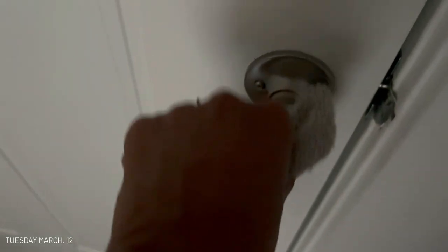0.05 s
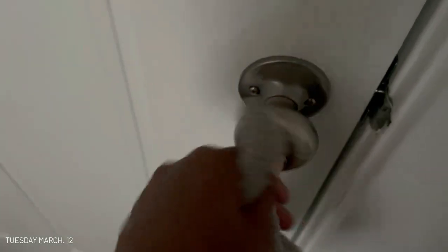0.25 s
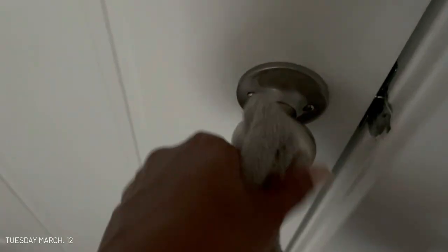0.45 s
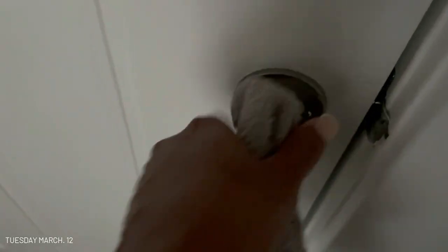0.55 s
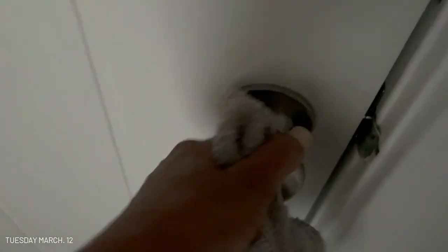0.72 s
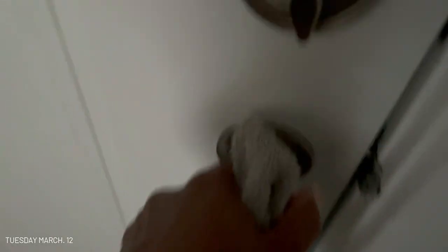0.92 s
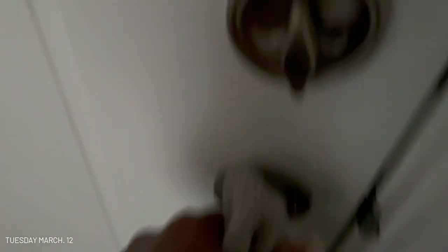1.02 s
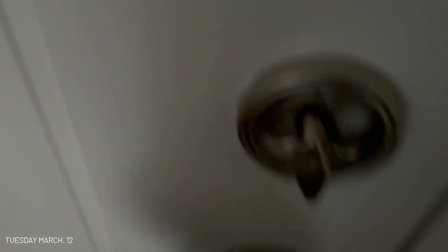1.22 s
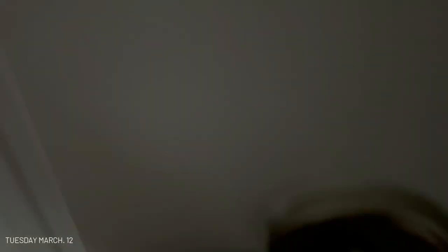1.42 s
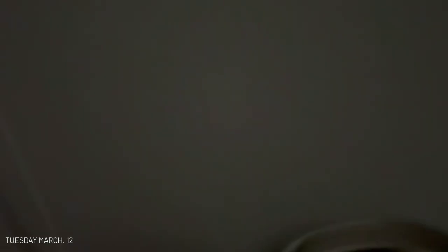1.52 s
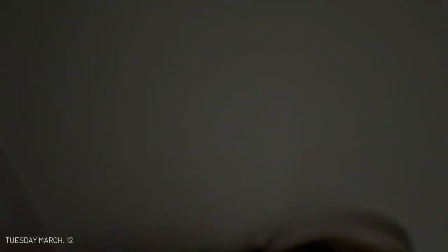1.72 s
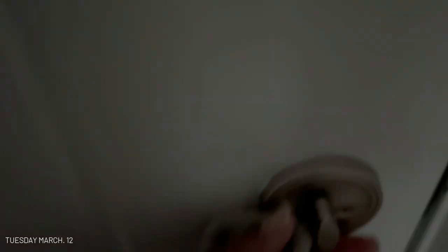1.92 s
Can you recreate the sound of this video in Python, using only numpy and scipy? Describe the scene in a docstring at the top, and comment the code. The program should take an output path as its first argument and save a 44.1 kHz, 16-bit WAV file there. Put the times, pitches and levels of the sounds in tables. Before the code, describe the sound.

A loose metal door knob clicks and rattles irregularly as a cloth rubs over it, with soft door thuds. Then the cloth brushes close past the microphone with a bump and a snap, over a small room's low hum.

```python
"""Over the low hum of a small quiet room, a cloth hisses and scratches across a metal door knob.
The loose knob clicks, rattles and rings as it is pushed against its stops, and the door thuds in its frame.
Then the cloth brushes past close to the microphone, with a soft bump and one sharp snap.
Clicks are noise bursts plus ringing modes, thuds are damped sines, and the cloth is shaped noise."""
import sys
import numpy as np
from scipy import signal
from scipy.fft import rfft, irfft, next_fast_len
from scipy.io import wavfile

SR = 44100
rng = np.random.default_rng(int(sys.argv[2]) if len(sys.argv) > 2 else 0)


def dump(signal):
    """Clip the signal to [-1, 1] and save it as 16-bit WAV at the path in sys.argv[1]."""
    limited = np.clip(np.atleast_2d(signal).T, -1, 1)
    pcm = np.round(limited * 32767).astype(np.int16)
    wavfile.write(sys.argv[1], SR, pcm)


N = 85995
HIT = np.arange(SR // 2) / SR  # time within one hit [s]

# EQ of the room tone and the handling rumble: (frequency [Hz], gain [dB])
ROOM_TONE_EQ = [(25, -18.5), (50, -6), (140, -0.5), (550, -13), (900, -22), (16000, -53.5)]
RUMBLE_EQ = [(25, -47), (50, 10), (100, 0.5), (400, -39)]
# fader rides of the rumble, the wipe on the knob and the close brush: (time [s], level [dB])
RUMBLE_FADER = [(0, -63), (.3, -56.5), (1.56, -49.5), (1.6, -38), (1.65, -43.5), (1.71, -52.5)]
WIPE_FADER = [(.085, -69), (.125, -47.5), (.2, -57.5), (.35, -51), (.45, -62), (.62, -47), (.75, -70),
              (.9, -54), (1.1, -62), (1.27, -48.5), (1.36, -88)]
BRUSH_FADER = [(.5, -81), (1.1, -61), (1.36, -65.5), (1.46, -55), (1.53, -57.5), (1.595, -48.5), (1.8, -67)]
# EQ of the cloth's wipe, brush and snap: (frequency [Hz], gain [dB])
WIPE_EQ = [(70, -19), (160, 13.5), (400, 1), (2000, -10), (5000, -27), (16000, -40)]
BRUSH_EQ = [(600, 6), (2000, -1.5), (7000, -11.5)]
SNAP_EQ = [(250, -4), (850, 3), (2600, -10), (4100, 3), (16000, -12.5)]
# knob clicks, layer balance: (time [s], door knock [dB], knob clank [dB], latch tick [dB])
CLICK_CUES = [(.121, -47.5, -44, -54), (0.2223, -60, -40, -40), (.225, -53, -39, -34.5),
              (.247, -44, -37, -40.5), (.326, -66, -41.5, -68), (.359, -47, -43, -50),
              (.370, -42, -49.5, -75), (0.476, -47, -49.5, -75), (.498, -49, -37, -60),
              (.507, -41, -37.5, -55), (0.5142, -28, -27.5, -36), (.528, -41, -63, -40),
              (.594, -40, -40.5, -51), (.604, -42, -45, -41.5), (.619, -39, -38.5, -67),
              (.789, -48, -45.5, -74), (0.8012, -32, -39, -45), (.807, -39, -36, -40.5),
              (0.8219, -40.5, -35, -39), (0.831, -38.5, -34.5, -49), (0.8359, -41, -32.5, -49),
              (0.9828, -46.5, -40.5, -39.5), (1.143, -55, -51, -58.5), (1.193, -47.5, -42, -77),
              (1.201, -42.5, -37.5, -44), (1.2223, -34.5, -35.5, -57), (1.261, -43, -48, -57),
              (1.276, -40, -39, -71)]
# EQ of those three layers: (frequency [Hz], gain [dB])
KNOCK_EQ = [(110, -22.5), (300, 1.5), (600, 6.5), (1700, -26)]
CLANK_EQ = [(550, -16), (1050, 0), (2200, -5), (3000, -11.5), (8000, -47)]
TICK_EQ = [(1800, -16), (3300, 5.5), (6000, -3.5), (8000, 3.5), (16000, -11)]
# modes of the knob's shell, the latch parts and the door panel: (frequency [Hz], relative level [dB])
SHELL_MODES = [(1190, -0.2), (1545, 4.9), (1810, 2.8), (2060, -2.3), (2245, 0.58)]
LATCH_MODES = [(5250, -8), (8550, 3.5), (11200, 0.5), (13500, -5.5)]
PANEL_MODES = [(199.65, -1), (253, -1), (306.7, -9), (477.8, -11.5), (581, -15.5)]
# hard catches that make one part of the knob or latch sing: (time [s], pitch [Hz], level [dB])
RING_CUES = [(0.2261, 11340, -32.5), (0.226, 13900, -41), (0.226, 2245, -34), (.229, 659, -34.5),
             (.515, 2300, -34.5), (0.517, 5030, -39), (.527, 549, -33), (0.8362, 1973, -28.5)]
# door thuds: (time [s], level [dB], pitch [Hz])
THUD_CUES = [(0.229, -33.5, 141.6), (.512, -36.5, 146), (.637, -28.5, 143.5), (.803, -28.5, 212.6),
             (.812, -33, 141), (.843, -28.5, 137.4), (1.009, -38.5, 204.3), (1.146, -38, 195),
             (1.223, -32.5, 146.6)]
# reverb decay: (frequency [Hz], T60 [s])
REVERB_T60 = [(600, 0.41), (3000, 0.13), (14000, 0.38)]
# reverb EQ: (frequency [Hz], gain [dB])
REVERB_EQ = [(1000, 2), (14000, -9)]
# stereo narrowness: (frequency [Hz], likeness of left and right [ratio, capped in use])
STEREO_LIKENESS = [(120, 1.32), (600, 0.39), (1200, 0.25), (2200, 0.57), (9000, 1.2)]
# stereo phase: (frequency [Hz], lead of the left [rad])
STEREO_LEAD = [(2200, -.1), (3700, 1.1), (7500, -.4), (10100, -3.14), (13300, -6.2), (16000, -8.7)]
# stereo balance: (frequency [Hz], left minus right [dB])
STEREO_TILT = [(5500, 2.5), (9500, -0.5)]


def amp(db):
    """Decibels to gain."""
    return 10 ** (np.asarray(db) / 20)


def decay(t60):
    """Envelope of a hit, falling 60 dB in t60 seconds."""
    return amp(-60 * HIT / t60)


def unit(x):
    """Scales to rms 1."""
    return x / np.sqrt(np.mean(x ** 2) + 1e-20)


def unit_hit(x, span_s=.007):
    """Scales each channel of a hit to the energy of a short span at rms 1."""
    return x / np.sqrt(np.sum(x ** 2, -1, keepdims=True) / (span_s * SR) + 1e-20)


def curve(points, hz):
    """Reads a table on a log-frequency axis."""
    f, value = np.transpose(points)
    return np.interp(np.log(hz + 1), np.log(f + 1), value)


def fader(points):
    """Gain over time from (time [s], level [dB]) points."""
    return amp(np.interp(np.arange(N) / SR, *np.transpose(points)))


def add(mix, s, sound):
    """Mixes a sound in at s seconds."""
    part = mix[:, max(round(s * SR), 0):][:, :sound.shape[1]]
    part += sound[:, :part.shape[1]]


def equalise(x, eq, size=2048):
    """Minimum-phase EQ."""
    log_gain = np.log(amp(curve(eq, abs(np.fft.fftfreq(size, 1 / SR)))))
    taps = np.fft.ifft(np.exp(np.conj(signal.hilbert(log_gain)))).real
    return signal.fftconvolve(x, taps[None], axes=1)[:, :x.shape[1]]


def noise(eq):
    """Steady coloured noise; like every source here, its two rows are mid and side."""
    return unit(equalise(rng.standard_normal((2, N)), eq, size=8192))


def crack(eq, t60, samples=6000, contact_db=11):
    """One hard contact, then dense chatter that dies fast."""
    burst = rng.standard_normal((2, samples)) * decay(t60)[:samples]
    burst[0, 0] = amp(contact_db)
    return unit_hit(np.pad(equalise(burst, eq), ((0, 0), (0, len(HIT) - samples))))


def modal_hits(modes, count, t60, spread_db=2.2, detune=0.0085):
    """An object rings for several blows; each new spot and grip shifts its modes a little."""
    hz, db = np.transpose(modes)[:, :, None]
    sign, size, shift = np.moveaxis(rng.standard_normal((count, 3, 2, len(modes), 1)), 1, 0)
    gains = np.sign(sign) * amp(db + spread_db * size)
    partials = gains * np.sin(2 * np.pi * hz * (1 + detune * shift) * HIT)
    return unit_hit(partials.sum(2) * decay(t60))


def room_bed(tone_db=-55.5, hum_hz=70.36, hum_db=-58):
    """Room tone with a low hum, and the rumble of the hand-held microphone."""
    hum = amp(hum_db) * np.sqrt(2) * np.sin(2 * np.pi * (hum_hz * np.arange(N) / SR + rng.random((2, 1))))
    return amp(tone_db) * noise(ROOM_TONE_EQ) + hum + fader(RUMBLE_FADER) * noise(RUMBLE_EQ)


def cloth_wipe(catches_per_s=360, scratch_s=0.0009, scratch_hz=(990, 2640), scratch_db=-5.5):
    """Cloth slides on metal: a soft hiss, and short scratches where the fibres catch."""
    catches = (rng.random(N) < catches_per_s / SR) * rng.random(N)
    grip = unit(signal.fftconvolve(catches, HIT * np.exp(-HIT / scratch_s))[:N])
    band = signal.butter(2, scratch_hz, "bandpass", fs=SR)
    scratch = unit(signal.lfilter(*band, rng.standard_normal((2, N))))
    return fader(WIPE_FADER) * (noise(WIPE_EQ) + amp(scratch_db) * grip * scratch)


def knob_clicks(shell_db=-8.5, latch_db=-8, trim_db=-2):
    """The loose knob hits its stops: the door knocks, the shell clanks, the latch ticks and shimmers."""
    out = np.zeros((2, N))
    shells = modal_hits(SHELL_MODES, len(CLICK_CUES), t60=0.074)
    latches = modal_hits(LATCH_MODES, len(CLICK_CUES), t60=0.064)
    for (s, knock_db, clank_db, tick_db), shell, latch in zip(CLICK_CUES, shells, latches):
        knock = crack(KNOCK_EQ, t60=0.04)
        clank = crack(CLANK_EQ, t60=0.023) + amp(shell_db) * shell
        tick = crack(TICK_EQ, t60=0.025) + amp(latch_db) * latch
        add(out, s, amp(knock_db) * knock + amp(clank_db) * clank + amp(tick_db) * tick)
    return amp(trim_db) * out


def metal_rings(q=1 / 0.065):
    """Chattering contact drives one resonance, which the cloth soon damps."""
    out = np.zeros((2, N))
    for s, hz, db in RING_CUES:
        chatter = rng.standard_normal((2, len(HIT))) * decay(t60=0.03)
        ring = signal.lfilter(*signal.iirpeak(hz, q, SR), chatter)
        add(out, s, amp(db) * unit_hit(ring))
    return out


def door_thuds(attack_s=0.0018, panel_db=-3.5):
    """The door is nudged against its frame: a low push, then the panel rings."""
    out = np.zeros((2, N))
    attack = 1 - np.exp(-HIT / attack_s)
    phases = np.array([[0], [np.pi / 2]])  # mid, side
    for (s, db, hz), panel in zip(THUD_CUES, modal_hits(PANEL_MODES, len(THUD_CUES), t60=0.32)):
        push = unit_hit(np.sin(2 * np.pi * hz * HIT + phases) * decay(t60=0.12))
        add(out, s, amp(db) * attack * (push + amp(panel_db) * panel))
    return out


def close_cloth(bump_s=1.4665, snap_s=1.6243, snap_db=-32.5):
    """Cloth brushes past the microphone, bumps and snaps once."""
    out = fader(BRUSH_FADER) * noise(BRUSH_EQ)
    add(out, bump_s, soft_bump())
    add(out, snap_s, amp(snap_db) * crack(SNAP_EQ, t60=0.011))
    return out


def soft_bump(start_hz=375, end_hz=143, sag_s=0.0048, t60=0.14, thump_db=-29.5, knock_db=-46):
    """A padded bump close to the microphone: its pitch drops as the contact softens."""
    hz = end_hz + (start_hz - end_hz) * np.exp(-HIT / sag_s)
    thump = unit_hit(np.sin(2 * np.pi * np.cumsum(hz) / SR) * decay(t60))
    mid_only = np.array([[1], [0]])
    return amp(thump_db) * thump * mid_only + amp(knock_db) * crack(KNOCK_EQ, t60)


def reverb(x, predelay_s=0.0029):
    """Echoes of a small hard room, each band dying at its own speed."""
    hz, t, bands = signal.stft(rng.standard_normal((2, len(HIT))), SR, nperseg=256)
    t60 = curve(REVERB_T60, hz)[:, None]
    bands *= amp(curve(REVERB_EQ, hz)[:, None] - 60 * t / t60)
    bands *= np.sqrt(2 * np.log(1000) / (t60 * SR))  # a longer decay adds no energy
    tail = signal.istft(bands, SR, nperseg=256)[1][:, :len(HIT)] * (HIT > predelay_s)
    return signal.fftconvolve(x, tail, axes=1)[:, :N]


def mic_pair(x):
    """Turns mid and side into left and right, with width, balance and phase set by frequency."""
    size = next_fast_len(N + 4096)
    hz = np.fft.rfftfreq(size, 1 / SR)
    mid, side = rfft(x, size)
    likeness = np.clip(curve(STEREO_LIKENESS, hz), 0, .995)
    sign = np.array([[1], [-1]])  # left, right
    pair = mid * np.sqrt((1 + likeness) / 2) + sign * side * np.sqrt((1 - likeness) / 2)
    balance = amp(sign * curve(STEREO_TILT, hz) / 2)
    phase = np.exp(.5j * sign * curve(STEREO_LEAD, hz))
    return irfft(pair * balance * phase, size)[:, :N]


def scene(knob_send_db=-6, door_send_db=-11, close_send_db=-13, close_pan_db=2):
    """Knob, door and cloth share one reverb over the room bed; the close cloth leans left."""
    knob = knob_clicks() + metal_rings() + cloth_wipe()
    door, close = door_thuds(), close_cloth()
    echoes = reverb(amp(knob_send_db) * knob + amp(door_send_db) * door + amp(close_send_db) * close)
    pan_left = amp(np.array([[.5], [-.5]]) * close_pan_db)
    return mic_pair(knob + door + echoes + room_bed()) + mic_pair(close) * pan_left


def record(dry, cutoff_hz=16100):
    """A steep low-pass takes the very top off the mix."""
    lowpass = signal.firwin(511, cutoff_hz, window=("kaiser", 9), fs=SR)
    return signal.oaconvolve(dry, lowpass[None], "same")


dry = scene()
out = record(dry)
dump(out)
```